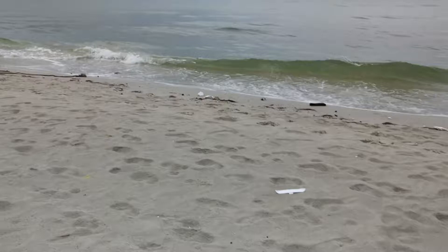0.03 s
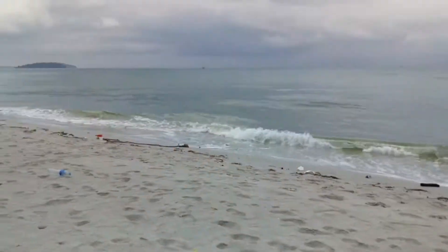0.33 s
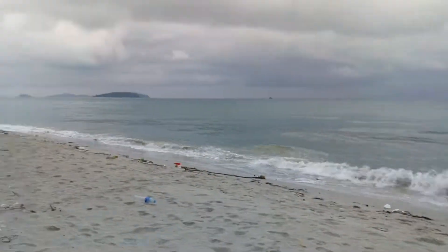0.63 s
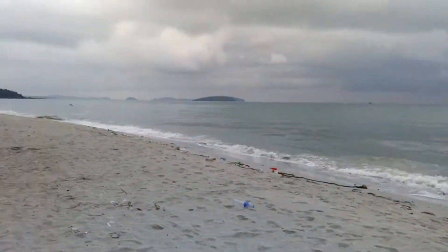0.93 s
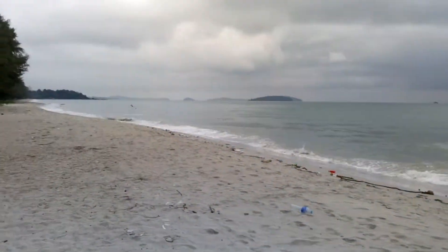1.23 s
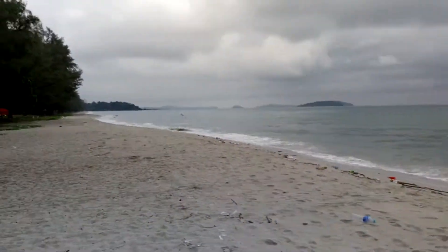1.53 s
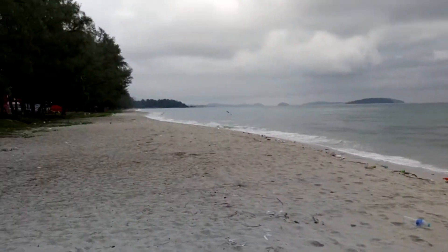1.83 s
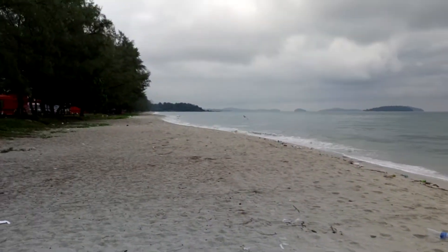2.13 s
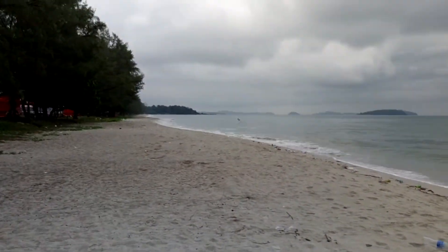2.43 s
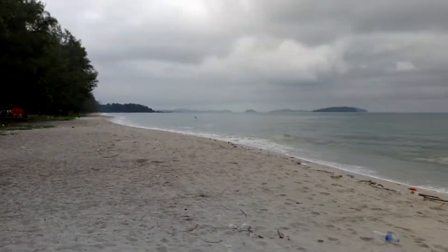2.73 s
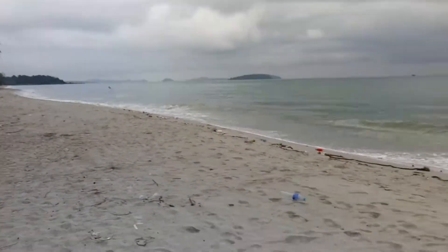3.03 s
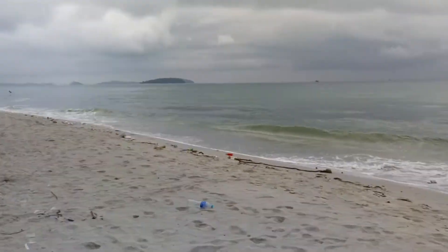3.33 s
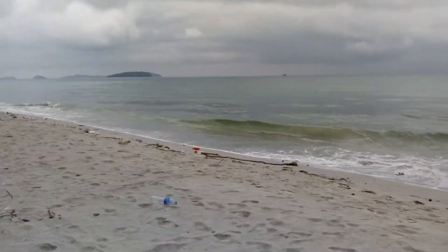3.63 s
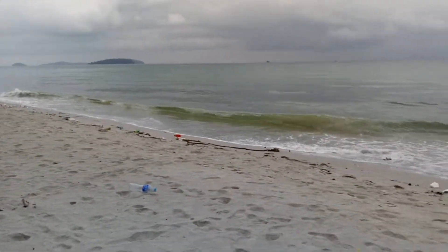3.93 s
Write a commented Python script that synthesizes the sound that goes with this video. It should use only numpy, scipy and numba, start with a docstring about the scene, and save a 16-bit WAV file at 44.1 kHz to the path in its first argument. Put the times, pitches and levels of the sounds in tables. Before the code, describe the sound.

A small wave breaks on a sandy beach, bubbling and hissing as it washes out. A distant boat engine thuds faintly underneath. As the water settles, wind buffets the right side of the microphone, with a few handling ticks.

```python
"""Small wave, distant boat

A small wave breaks on sand to the right of a hand-held camera and washes out as a froth of ringing
bubbles, with a fine high sizzle and hollow slaps of collapsing air pockets, over a bed of far surf.
Out at sea a slow one-cylinder boat engine thuds through its exhaust pipe. A gust buffets mainly the
right microphone; the casing ticks, and near the end something brushes the camera. The sound fades in."""
import sys
import numpy as np
from scipy import signal
from scipy.fft import rfft, irfft
from scipy.io import wavfile
from scipy.ndimage import uniform_filter1d, map_coordinates
from numba import njit

SR = 44100
rng = np.random.default_rng(int(sys.argv[2]) if len(sys.argv) > 2 else 0)


def generate_wav(sig):
    """Save sig (samples, or channels by samples) to the path in sys.argv[1] as 16-bit PCM at SR."""
    pcm = np.round(np.clip(np.atleast_2d(sig).T, -1, 1) * 32767).astype(np.int16)
    wavfile.write(sys.argv[1], SR, pcm)


N = 176400

# tone of the distant surf: f/Hz, level/dB
FAR_SURF_EQ = [(40, -23), (150, -6), (450, 3.5), (700, 2), (1100, -3), (2000, -4.5), (3500, -18.5),
               (6500, -15), (15000, -45)]
# envelope of the wave in five registers: t/s, then level/dB of rumble, gurgle, wash, splash, hiss
WAVE_LEVELS = [(.29,-6,-13.5,-6.5,-9,-4), (.32,-6,-0.5,-2.5,0.5,1.5), (.44,-1.5,2,3.5,-1,.5),
               (.55,-1,2.5,-1.5,-2.7,-2), (.65,-1.5,-1,-1.5,-1.5,0.3), (.78,1.5,1,.5,2,0.3),
               (.97,0,-3.5,0.5,-1.5,0.9), (1.1,0.5,1.5,0,-1,0.3), (1.27,2.5,-3,2,-1.9,0.2),
               (1.5,-1,1.5,1,0,-1.3), (1.72,-.5,-2,-2.5,-2.2,-4.5), (1.95,-1.5,-4,-2.5,-4.5,-4.5),
               (2.2,-0.3,-1,-5.5,-6.3,-7.5), (2.5,-1.3,-3.5,-7,-8.5,-8.5), (2.8,-1,-3.5,-6.5,-8,-9),
               (3.25,-7,-11.5,-11,-12,-13.5), (3.5,-8.5,-15,-14,-18,-16.5), (3.7,-12.5,-17,-17,-20,-16.5),
               (4,-11,-16,-17,-25,-15.5)]
# centres of those five registers: f/Hz
REGISTER_CENTRES = [280, 620, 1150, 1900, 5000]
# tone of the breaking water: f/Hz, level/dB
WATER_EQ = [(20, -18), (40, -15), (62, -8), (120, 3), (220, -0.5), (310, -3), (400, -2.5), (600, -1),
            (850, -4.5), (1100, -4), (1300, -7), (2000, -8), (3000, -11.5), (4500, -11.5), (6500, -13.5),
            (15000, -22)]
# the wave runs along the shore as the camera turns:
# t/s, left microphone delay/ms, relative source width, hiss left minus right/dB
WAVE_BEARING = [(.2, 0.019, 0.21, 1), (.4, 0.22, 1.4, 3.5), (.8, 0.31, 1.5, -0.5), (1.2, 0.4, 1.9, -2.5),
                (1.55, .47, 0.34, -1), (1.85, 0.45, 0.35, -1), (2.2, .41, 1.1, 0.5), (3, 0.4, 1.2, 1),
                (3.5, 0.45, 1.3, 0), (4, 0.31, 2, 1)]
# stereo image of the water: f/Hz, share common to both sides at width 1 (0-1), left minus right/dB
WATER_IMAGE = [(100, 1, -.5), (400, 0.96, -0.5), (800, 0.89, 0), (1240, 0.93, -1.5), (1960, 0.31, -3.5),
               (3370, 0.18, -6.5), (5500, 0.02, -4), (7000, 0.02, -2), (9500, 0.05, 0.5)]
# tone of the high sizzle: f/Hz, level/dB
SIZZLE_EQ = [(3000, -30), (6000, 2), (7200, 5), (8500, -3), (10000, -9.5), (13500, -9), (16000, -16)]
# exhaust pipe resonances: f/Hz, bandwidth/Hz, level/dB
EXHAUST_MODES = [(108.3, 32, 2), (175.4, 41, 1), (273, 30, -10)]
# fader ride of the boat: t/s, level/dB
BOAT_LEVEL = [(.2, -42.5), (1.2, -39.5), (2.3, -42), (3.2, -42.5), (3.7, -39.5), (4, -43)]
# ticks of the casing: t/s, left peak level/dB, right peak level/dB
TICK_CUES = [(.2178, -36, -13.5), (.219, -18, -30), (2.0716, -46, -13.5), (3.859, -46, -13.5)]
# tone of a tick: f/Hz, level/dB
TICK_EQ = [(2000, -30), (4000, -6), (5500, 3), (6400, 9.5), (7500, -1), (9000, -9), (12000, -21),
           (16000, -27)]
# slaps of collapsing water: t/s, level/dB, f/Hz
SLAP_CUES = [(.735, -29.5, 227), (0.793, -30, 213), (0.971, -21, 464), (1.078, -25, 250),
             (1.388, -24.5, 200), (1.706, -25, 350)]
# wind on the right microphone: t/s, level/dB
GUST_LEVEL = [(2.2, -43), (2.5, -38.5), (2.63, -35), (2.7, -28.5), (2.8, -29), (2.87, -35), (2.94, -30),
              (3.04, -36), (3.14, -40), (3.2, -33), (3.37, -35.5), (3.46, -60)]
# tone of the wind: f/Hz, level/dB
WIND_EQ = [(5, -50), (20, -14), (40, -10), (70, -0.5), (125, 0), (190, -0.5), (280, -16.5), (500, -20),
           (1500, -78)]
# single eddies on the right microphone: t/s, peak level/dB, f/Hz, half-length/cycles
EDDY_CUES = [(2.583, -20, 140, 0.74), (2.746, -18, 130, .8), (2.915, -24, 105, 0.65),
             (3.0, -20.5, 170, 1.1), (3.087, -21.5, 135, .8), (3.215, -16.5, 153, 1.1),
             (3.305, -23, 165, 0.59), (3.396, -19.5, 140, 0.53)]
# tone of the brushing: f/Hz, level/dB
BRUSH_EQ = [(800, -5), (2000, -3), (2700, -3), (3400, -5), (4600, 5.5), (6500, -2), (15000, -12)]
# treble colour of surf and brush, a deep dip from 8 to 14 kHz, a narrow peak near 15 kHz: f/Hz, level/dB
TREBLE_EQ = [(20, 2), (6500, 0), (7500, -12), (8300, -23.5), (10000, -19), (14000, -19), (14900, 1.5),
             (16000, -10)]

WIND_LEFT_DB = -19  # left microphone relative to the right
TIME, BIN_HZ = np.arange(N) / SR, np.arange(N // 2 + 1) * SR / N
PAN = np.array([[.5], [-.5]])  # splits a left-minus-right level between the channels


def undb(db):
    """Decibels to gain."""
    return 10 ** (np.asarray(db) / 20)


def unit(x):
    """Scale to rms 1."""
    return x / np.sqrt(np.mean(x ** 2))


def curve(table, column=1):
    """One column of a time table, for every sample."""
    rows = np.array(table, float)
    return np.interp(TIME, rows[:, 0], rows[:, column])


def over_hz(table, hz, column=1):
    """One column of a frequency table, read on a log axis."""
    rows = np.array(table, float)
    return np.interp(np.log(hz + 1), np.log(rows[:, 0]), rows[:, column])


def eq(x, table):
    """Shape the tone with a table of f/Hz, level/dB."""
    return irfft(rfft(x) * undb(over_hz(table, BIN_HZ)), N)


def drift(rate_hz):
    """Smooth random modulation with rms 1."""
    hold = max(int(SR / rate_hz), 1)
    steps = np.repeat(rng.standard_normal(N // hold + 1), hold)
    return unit(uniform_filter1d(uniform_filter1d(steps, hold), hold)[:N])


def resonate(x, hz, width_hz):
    """A resonance with gain 1 at its centre."""
    return signal.lfilter(*signal.iirpeak(hz, hz / width_hz, fs=SR), x)


def far_surf():
    """Distant waves from all directions blur into a smooth, wide bed."""
    return unit(eq(rng.standard_normal((2, N)), FAR_SURF_EQ)) * undb(-50)


@njit
def ring_bubbles(starts, hz, gains, cycles, rise):
    """Each bubble rings as a decaying sine that glides upward."""
    out = np.zeros(N)
    for k in range(len(starts)):
        length, phase = cycles * SR / hz[k], 0.
        for i in range(min(int(length), N - starts[k])):
            phase += 2 * np.pi * hz[k] / SR * (1 + rise * i / length)
            out[starts[k] + i] += gains[k] * np.exp(-5 * i / length) * np.sin(phase)
    return out


def froth():
    """A swarm of bubbles of all sizes rings in a hiss of fine spray."""
    bubbles_per_s, scatter_db, spray_db = 5000, 2.5, 2
    when, pitch, strength = rng.random((int(bubbles_per_s * N / SR), 3)).T
    hz = (14 + 110 * pitch) ** 2
    accent_db = scatter_db * np.minimum(-np.log(1 - strength), 5)
    gains = hz ** .75 * undb(accent_db)  # the tilt keeps the swarm's spectrum flat
    bubbles = ring_bubbles((when * N).astype(np.int64), hz, gains, cycles=16.9, rise=.12)
    spray = undb(spray_db) * rng.standard_normal(N)
    return unit(unit(bubbles - bubbles.mean()) + spray)


def from_shore(x):
    """Sound from the water reaches the left microphone late."""
    delay_samples = curve(WAVE_BEARING) * SR / 1000
    left = map_coordinates(x, [np.arange(N) - delay_samples], mode="mirror")
    return np.array([left, x])


def breaking_wave():
    """Froth swells and washes out, treble first; the wider the wave, the less alike the two sides."""
    trim_db, flicker_db, slosh_db, settle_s = -28.5, 1.17, .34, 6.6
    tone = unit(undb(over_hz(WATER_EQ, BIN_HZ))) * undb(PAN * over_hz(WATER_IMAGE, BIN_HZ, column=2))
    direct = rfft(from_shore(froth())) * tone
    diffuse = rfft(np.array([froth(), froth()])) * tone
    registers_db = np.array([curve(WAVE_LEVELS, column=k + 1) for k in range(5)])
    width = curve(WAVE_BEARING, column=2)
    hiss_pan_db = PAN * curve(WAVE_BEARING, column=3)
    churn_db = flicker_db * np.exp(-TIME / settle_s)  # the water churns, then settles
    sway_db = slosh_db * drift(rate_hz=14)  # moves all bands together
    centres = np.geomspace(100, 14000, 15)
    out = 0
    for hz, pick in zip(centres, np.eye(len(centres))):
        window = np.interp(np.log(BIN_HZ + 1), np.log(centres), pick)
        shared = over_hz(WATER_IMAGE, hz) ** width
        band = np.sqrt(shared) * irfft(direct * window, N)
        band += np.sqrt(1 - shared) * irfft(diffuse * window, N)
        # each band follows a blend of its nearest registers
        blend = np.array([np.interp(np.log(hz), np.log(REGISTER_CENTRES), row) for row in np.eye(5)])
        ride_db = blend @ registers_db + blend[-1] * hiss_pan_db
        out += band * undb(ride_db + sway_db + churn_db * drift(rate_hz=25.06))
    return out * undb(trim_db)


def sizzle():
    """A fine high sizzle, heard only while the wave's hiss is loud."""
    grains_per_s, base_db, pan_db, expansion = 5000, -49, -4.5, 2.3
    grains = rng.standard_normal((2, N)) * (rng.random((2, N)) < grains_per_s / SR)
    hiss_db = curve(WAVE_LEVELS, column=5)
    level_db = base_db + expansion * hiss_db + drift(rate_hz=39.7)  # with 1 dB of flicker
    return unit(eq(grains, SIZZLE_EQ)) * undb(level_db + PAN * pan_db)


def boat():
    """Each firing sends a double pulse and a chuff of gas through the resonant exhaust pipe."""
    first_s, period_s, jitter_s = .162, .0725, .0007
    lead_s, lead_jitter_s, lead_db, lead_scatter_db = .01, .0012, -5, 3
    chuff_s, chuff_gain, chuff_floor = .0076, .4, .08
    firings = np.arange(first_s, N / SR, period_s)
    thud_slip, thud_db, lead_accent, lead_slip = rng.standard_normal((len(firings), 4)).T
    thuds = firings + jitter_s * thud_slip
    leads = thuds - lead_s + lead_jitter_s * lead_slip  # a weaker pulse ahead of each thud
    pulses = np.zeros(N)
    for when, db in ((thuds, thud_db), (leads, lead_db + lead_scatter_db * lead_accent)):
        pulses[np.clip((when * SR).astype(int), 0, N - 1)] = undb(db)
    from_firing_s = (TIME - first_s + period_s / 2) % period_s - period_s / 2
    gas = (np.exp(-(from_firing_s / chuff_s) ** 2) + chuff_floor) * rng.standard_normal(N)
    drive = unit(pulses) + chuff_gain * unit(gas)
    pipe = sum(undb(db) * resonate(drive, hz, width_hz) for hz, width_hz, db in EXHAUST_MODES)
    thud_band = signal.butter(3, [78, 299], "bandpass", fs=SR, output="sos")
    return unit(signal.sosfilt(thud_band, pipe)) * undb(curve(BOAT_LEVEL))


def casing_ticks():
    """The camera casing gives a few tiny, bright ticks, each mostly on one side."""
    out = 0
    for at, left_db, right_db in TICK_CUES:
        tick = eq(signal.unit_impulse(N, int(at * SR)), TICK_EQ)
        out += tick / tick.max() * undb([[left_db], [right_db]])
    return out


def slaps():
    """Pockets of air collapse in the wave with short hollow slaps."""
    attack_s, decay_s, relative_width = .0019, .015, .59
    out = 0
    for at, db, hz in SLAP_CUES:
        age = np.maximum(TIME - at, 0)
        envelope = np.minimum(age / attack_s, 1) * np.exp(-np.maximum(age - attack_s, 0) / decay_s)
        body = rng.standard_normal(N)
        for _ in range(2):
            body = resonate(body, hz, relative_width * hz)
        out += undb(db) * unit(body) * envelope
    return from_shore(out)


def gust():
    """Eddies buffet each microphone separately with a fluttering rumble, mainly the right one."""
    buffet_db = 3
    left, right = (eq(rng.standard_normal(N), WIND_EQ) * undb(buffet_db * drift(rate_hz=34.7))
                   for _ in range(2))
    return np.array([undb(WIND_LEFT_DB) * unit(left), unit(right)]) * undb(curve(GUST_LEVEL))


def eddy_bumps():
    """Single eddies hit the right microphone, each a short soft push and rebound."""
    out = 0
    for at, db, hz, half_length in EDDY_CUES:
        cycles = (TIME - at) * hz
        out -= undb(db) * np.exp(-(cycles / half_length) ** 2) * np.cos(2 * np.pi * cycles)
    return out * undb([[WIND_LEFT_DB], [0]])


def brush():
    """Something slides over the camera body with a short, bright rustle."""
    start_s, end_s, attack_s, release_s = 3.725, 3.88, .017, .074
    level_db, pan_db = -45, -5
    touch = np.clip((TIME - start_s) / attack_s, 0, 1) * np.clip((end_s - TIME) / release_s, 0, 1)
    rustle = eq(rng.standard_normal((2, N)), BRUSH_EQ)
    return unit(eq(rustle, TREBLE_EQ)) * touch * undb(level_db + PAN * pan_db)


def scene():
    """The stereo mix: near and distant water, the boat, wind and handling noise."""
    water = eq(breaking_wave() + far_surf(), TREBLE_EQ) + sizzle() + slaps()
    return water + boat() + gust() + eddy_bumps() + casing_ticks() + brush()


def record(dry):
    """A quick fade-in and a steep high cut."""
    fade_start_s, fade_length_s, high_cut_hz = .093, .18, 15700
    fade = np.clip((TIME - fade_start_s) / fade_length_s, 0, 1)
    return signal.sosfilt(signal.ellip(10, .2, 80, high_cut_hz, fs=SR, output="sos"), dry * fade)


dry = scene()
out = record(dry)
generate_wav(out)
```